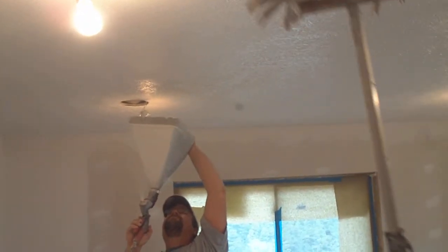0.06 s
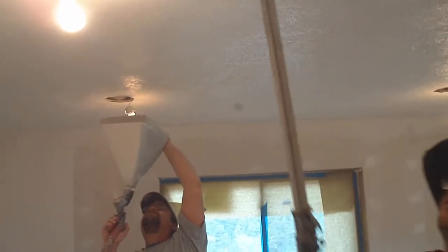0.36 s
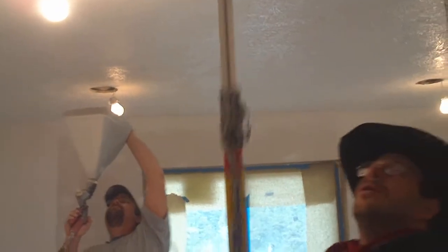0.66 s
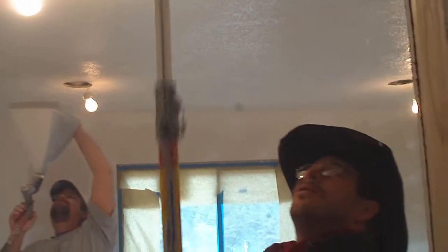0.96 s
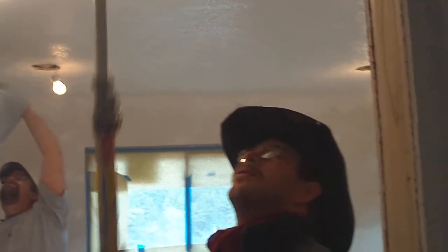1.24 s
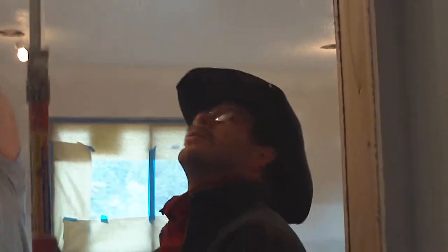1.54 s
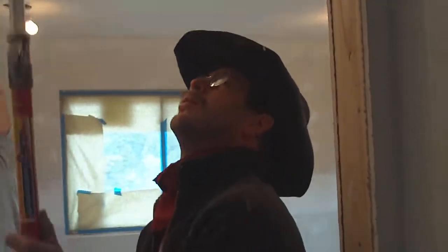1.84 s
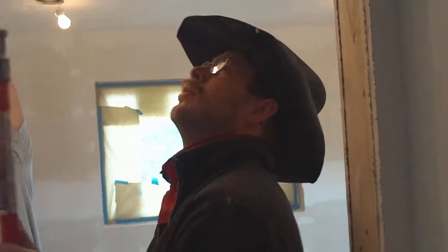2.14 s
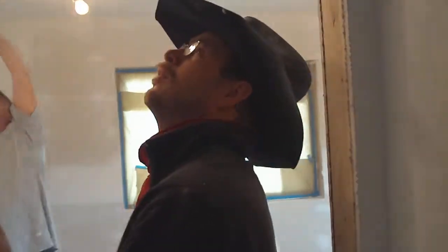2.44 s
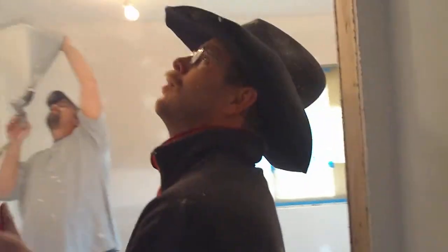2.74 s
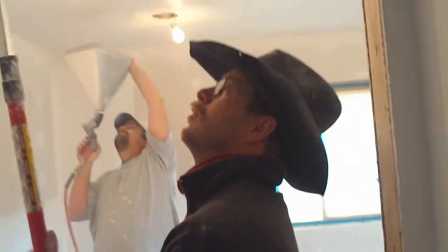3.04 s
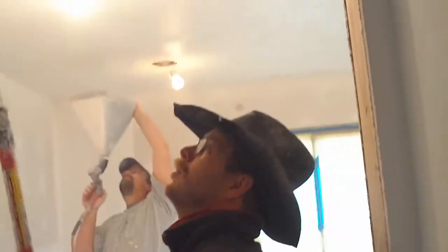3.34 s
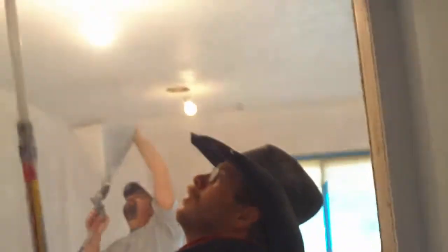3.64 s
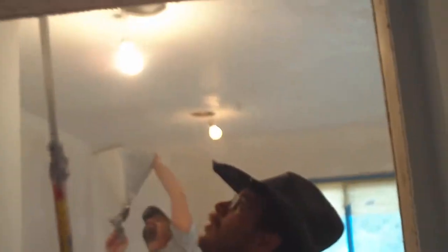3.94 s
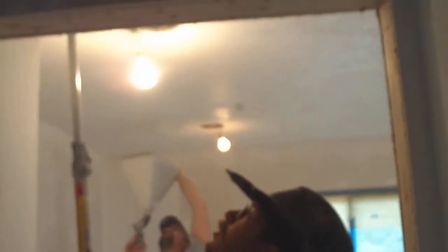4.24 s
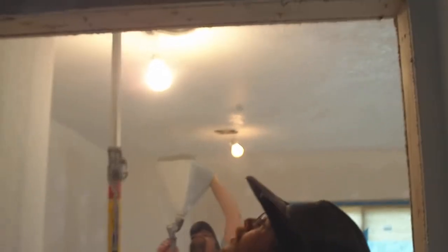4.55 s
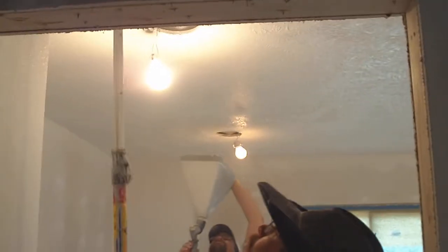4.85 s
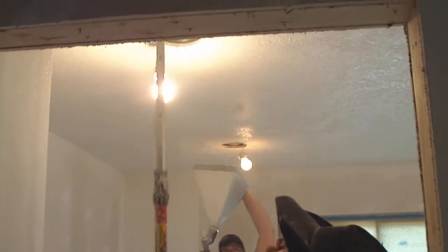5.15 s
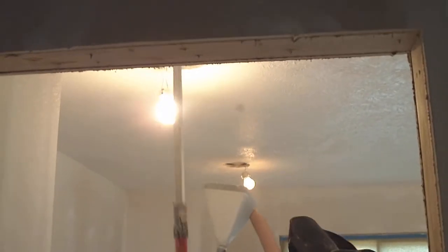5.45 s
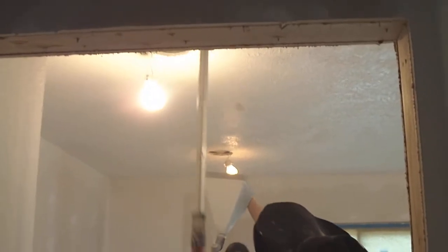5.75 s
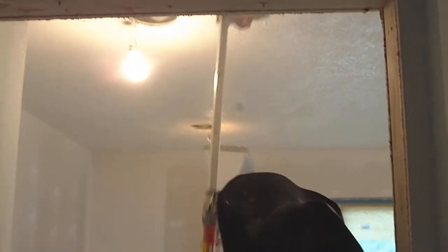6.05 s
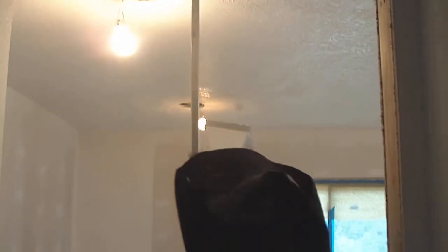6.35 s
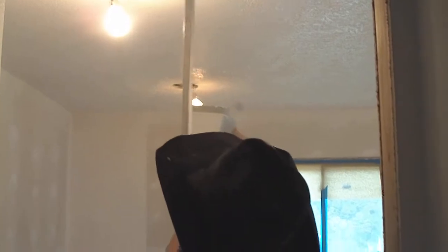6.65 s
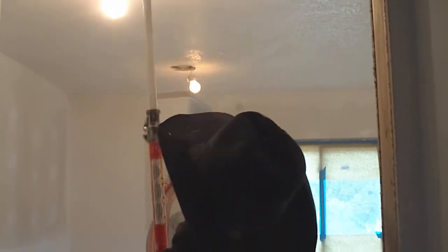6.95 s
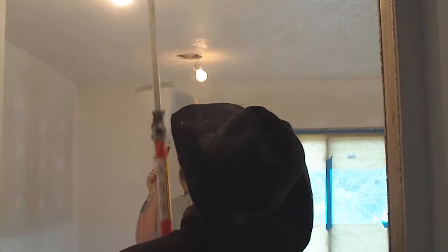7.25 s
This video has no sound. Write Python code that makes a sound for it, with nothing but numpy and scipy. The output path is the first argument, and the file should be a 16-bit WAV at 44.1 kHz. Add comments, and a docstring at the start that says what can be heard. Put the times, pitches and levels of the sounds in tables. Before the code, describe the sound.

Loud, constant air hiss from a ceiling texture sprayer, with soft rhythmic brush thumps and a low rumble underneath.

```python
"""A bare room, drywall ceiling being textured. A hopper gun sprays mud: loud, steady air hiss,
its colour drifting as the gun moves and the reflections shift. Closer, a pole brush stomps the
wet ceiling about 3.5 times a second: panels thud, bristles slap, the room booms; one short
scrape. Underneath, a low rumble, probably the compressor. Mono, band-limited."""
import sys
import numpy as np
from scipy.fft import rfft, irfft, next_fast_len
from scipy.io import wavfile
from scipy.ndimage import map_coordinates

SR = 44100
rng = np.random.default_rng(int(sys.argv[2]) if len(sys.argv) > 2 else 0)


def to_wav(s):
    """Save 16-bit WAV."""
    ch = np.atleast_2d(s).T  # columns
    pcm = np.round(np.clip(ch, -1, 1) * 32767)  # PCM
    wavfile.write(sys.argv[1], SR, pcm.astype(np.int16))


N = 326340

# Spectra of nozzle hiss, jet body, low rush: f/Hz, relative density/dB
HISS_SPECTRUM = [(2000, -26.5), (3200, -15), (4000, -4.5), (4900, 0), (5500, 0.5), (6100, 1.5), (6600, 1),
                 (7000, -4.5), (7280, -7.5), (7500, -41)]
JET_SPECTRUM = [(900, -21), (1500, -9), (1900, -5.5), (2130, 0), (2700, 0), (3100, 0.1), (3600, -0.34),
                (4500, -3), (7000, -38)]
RUSH_SPECTRUM = [(100, -18.5), (250, -15), (370, -9.5), (450, -2), (530, -1.5), (640, 0.8), (950, 0.3),
                 (1400, 1), (1900, 1.5), (3500, -29.5)]
# Spray envelope as the gun moves: t/s, level/dB
SPRAY_ENVELOPE = [(0, -22), (.8, -21), (1, -22), (1.9, -22.5), (2.33, -22.5), (2.47, -23.5), (2.7, -22.5),
                  (3.75, -21.5), (4.05, -22), (4.6, -21.5), (5.5, -20.5), (5.85, -21), (6.25, -21),
                  (6.9, -21), (7.15, -22), (7.4, -21.5)]
# Near reflections: nominal delay/s, relative gain
REFLECTIONS = [(.0009, 0.15), (.0028, 0.12), (.0075, 0.18), (.013, 0.23)]
# Brush blows: t/s, level/dB, relative flex/dB, relative knock/dB
BLOWS = [(0.871, -46, 6.5, -5), (0.948, -41.5, -2, -14), (1.211, -33.5, -19, -17.5),
         (1.484, -31, -11.5, -19.5), (1.764, -35, -14, -8), (2.046, -33.5, -20, -12.5),
         (2.353, -45, -3, -16), (2.62, -36.5, -7, -9), (2.928, -48.5, 2.5, -2), (3.219, -43, -2.5, -4),
         (3.49, -42.5, 0, -7.5), (3.759, -36.5, -2, -21.5), (4.043, -37, -12, -3.5), (4.322, -34, -12, -11),
         (4.609, -32.5, -15, -10.5), (4.887, -37, 0.5, -9), (5.172, -37.5, 1, -1), (5.2, -40, -4, -2),
         (5.453, -30.5, -4, -6.5), (5.737, -39.5, -3, -11.5), (5.998, -39, 2.5, -9),
         (6.289, -35.5, -4, -10.5), (6.571, -33.5, 0, -11), (7.12, -40.5, 2.5, -16)]
# Struck panel: ratio to main tone, level/dB, t60/s
PANEL_MODES = [(.8, -11.5, 0.28), (1, 0, 0.17), (1.17, -9, 0.24), (1.33, -10.5, 0.25)]
# Joists and room flexing behind the panel: f/Hz, level/dB, t60/s
FLEX_MODES = [(46, -6.5, 0.24), (60, -1.5, .45), (79, -0.5, 0.38), (98, 0.5, 0.38)]
# Hard contact of the brush block: f/Hz, level/dB, t60/s
KNOCK_MODES = [(200, 2, 0.26), (230, -5.5, .18), (264, 1, 0.27), (307, -8, 0.21), (433, -10, 0.33),
               (567, -8.5, 0.29)]
# Rumble spectrum: f/Hz, relative density/dB
RUMBLE_SPECTRUM = [(20, -12.5), (30, -8), (43, -3), (54, -4.5), (70, 4.5), (84, 0.5), (97, 0.5),
                   (122, -7.5), (180, -2.5), (212, 1.5), (240, -8), (350, -8), (600, -31.5)]
# Rumble envelope: t/s, level/dB
RUMBLE_ENVELOPE = [(.3, -59), (.65, -48), (2.3, -55.5), (3.2, -46.5), (4, -55.5), (4.5, -39.5), (5.05, -48),
                   (5.6, -40.5), (6, -46.5), (7.4, -49.5)]


def spray_gun(sputter_db=0.45, flutter_db=0.48, drift_db=0.24):
    """Air tears mud apart at the nozzle; uneven feed makes the jet sputter slightly."""
    level_db, = curves(SPRAY_ENVELOPE)
    mean_db = level_db.mean()
    feed_db = sputter_db * wobble(rate_hz=22)
    # spectrum, offset/dB, envelope depth, reflection gain
    bands = [(HISS_SPECTRUM, 0, 0.78, 1.1), (JET_SPECTRUM, -4.5, 1, 1.06),
             (RUSH_SPECTRUM, -14, 1.3, 1.07)]
    out = np.zeros(N)
    for spectrum, offset_db, depth, wall_gain in bands:
        band_db = mean_db + offset_db + depth * (level_db - mean_db)
        turbulence_db = flutter_db * wobble(rate_hz=30)
        aim_db = drift_db * wobble(rate_hz=4)
        air = wall_reflections(noise(spectrum), wall_gain)
        out += amp(band_db + feed_db + turbulence_db + aim_db) * air
    return out


def wall_reflections(x, wall_gain, delay_spread=0.25, sweep_hz=3):
    """Bare surfaces comb the sound; paths crossfade as the gun sweeps. Output rms 1."""
    out, n = x.copy(), np.arange(N)
    for delay_s, gain in REFLECTIONS:
        path, blend = np.divmod(n * sweep_hz / SR + rng.random(), 1)
        lags = (SR * delay_s * np.exp(delay_spread * rng.standard_normal(64))).astype(int)
        old, new = (x[(n - lags[path.astype(int) + k]) % N] for k in (0, 1))
        fade_rad = blend * np.pi / 2
        out += wall_gain * gain * (old * np.cos(fade_rad) + new * np.sin(fade_rad))
    return unit(out)


def brush_stomps(panel_db=8.5, rebound_s=0.068, rebound_db=-7, room_t60_s=0.53, slap_t60_s=0.45):
    """Each blow rings the ceiling and rebounds once; bristles slap wet mud, the room booms."""
    out, t = np.zeros(N + SR), np.arange(SR * 3 // 5) / SR
    room = noise([(25, -23.5), (55, -11), (100, -2.5), (150, -8.5), (200, -6), (300, -9),
                  (600, -43), (2000, -79.5)])
    bristles = noise([(200, -14.5), (450, 3), (700, 2), (1200, -11.5), (6000, -40)])
    onset = 1 - np.exp(-t / 0.0059)
    typical_blow_db = -37.5
    for start_s, blow_db, flex_db, knock_db in BLOWS:
        start = round(start_s * SR)
        panel_hz = 152.2 + 0.75 * knock_db  # softer contact rings lower
        strike = ring(PANEL_MODES, t, panel_hz)
        rebound = amp(rebound_db) * ring(PANEL_MODES, np.maximum(t - rebound_s, 0), panel_hz)
        flex = amp(flex_db + 1) * ring(FLEX_MODES, t)
        knock = amp(knock_db + 3) * ring(KNOCK_MODES, t)
        thud = amp(blow_db) * (amp(panel_db) * (strike + rebound) + flex + knock)
        boom = amp(blow_db - 6 - 60 * t / room_t60_s) * np.roll(room, -start)[:len(t)]
        slap_db = -43 + 0.7 * (blow_db - typical_blow_db)
        slap = amp(slap_db - 60 * t / slap_t60_s) * np.roll(bristles, -start)[:len(t)]
        out[start:start + len(t)] += thud + (boom + slap) * onset
    return out[:N]


def ring(modes, t, freq_scale=1, attack_s=0.0034, spread_db=0.3, detune=0.014):
    """Damped modes after a soft blow; pitch, level and phase vary per call."""
    freq, level_db, t60_s = np.transpose(modes)[:, :, None]
    f_hz = freq_scale * freq * (1 + detune * rng.standard_normal(freq.shape))
    decay = amp(level_db + spread_db * rng.standard_normal(freq.shape) - 60 * t / t60_s)
    phase_rad = 2 * np.pi * (f_hz * t + rng.random(freq.shape))
    return np.sum(decay * np.sin(phase_rad), axis=0) * (1 - np.exp(-t / attack_s))


def brush_scrape(start_s=4.32, end_s=4.74, ramp_s=0.031, level_db=-43, rough_db=4):
    """The brush, pressed hard, drags once along the wet ceiling."""
    t = np.arange(N) / SR
    stroke = np.clip(np.minimum(t - start_s, end_s - t) / ramp_s, 0, 1)
    friction = noise([(200, -23), (350, -12), (430, -5), (550, 1), (660, -3), (900, -8), (3000, -48)])
    return stroke * amp(level_db + rough_db * wobble(rate_hz=40)) * friction


def rumble(waver_db=1):
    """Uneven drone, probably the compressor, swelling in the room's low resonances."""
    level_db, = curves(RUMBLE_ENVELOPE)
    return amp(level_db + waver_db * wobble(rate_hz=4)) * noise(RUMBLE_SPECTRUM)


def amp(db):
    """dB to gain."""
    return 10 ** (np.asarray(db) / 20)


def unit(x):
    """Scale to rms 1."""
    return x / np.sqrt(np.mean(x ** 2) + 1e-20)


def curves(rows):
    """Per-sample curve for each column after t/s."""
    times_s, *columns = np.transpose(rows)
    return [np.interp(np.arange(N) / SR, times_s, column) for column in columns]


def wobble(rate_hz):
    """Smooth curve through random knots."""
    knots = rng.standard_normal(int(N * rate_hz / SR) + 4)
    return map_coordinates(knots, [np.arange(N) * rate_hz / SR])


def filtered(x, response):
    """FFT filter; response maps f/Hz to gain."""
    size = next_fast_len(N + SR // 2)
    return irfft(rfft(x, size) * response(np.fft.rfftfreq(size, 1 / SR)), size)[:N]


def noise(spectrum):
    """Noise of rms 1, shaped by (f/Hz, density/dB) points on a log axis."""
    f_hz, db = np.transpose(spectrum)
    white = rng.standard_normal(N)
    return unit(filtered(white, lambda hz: amp(np.interp(np.log(hz + 1), np.log(f_hz), db))))


def scene():
    """All sources at one microphone, same on both channels."""
    mono = spray_gun() + brush_stomps() + brush_scrape() + rumble()
    return np.array([mono, mono])


def record(dry, cutoff_hz=7560):
    """Steep low-pass: a small camera's band limit."""
    return np.array([filtered(x, lambda hz: 1 / (1 + (hz / cutoff_hz) ** 300)) for x in dry])


dry = scene()
out = record(dry)
to_wav(out)
```